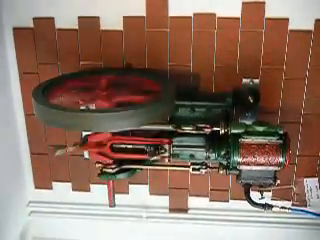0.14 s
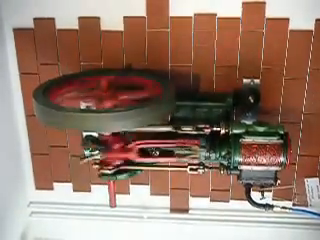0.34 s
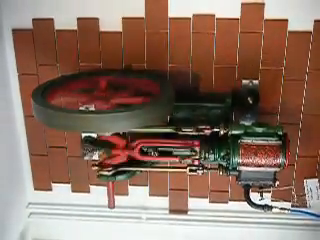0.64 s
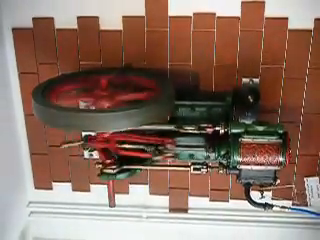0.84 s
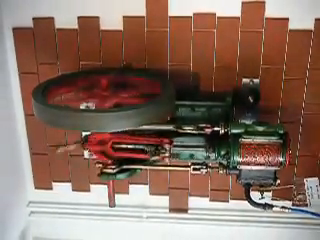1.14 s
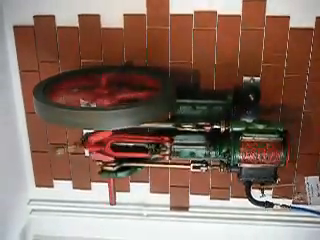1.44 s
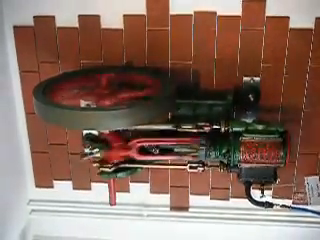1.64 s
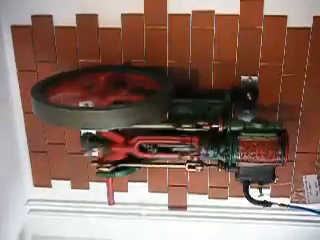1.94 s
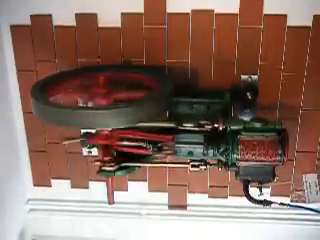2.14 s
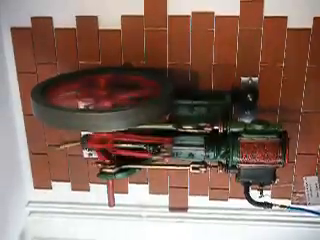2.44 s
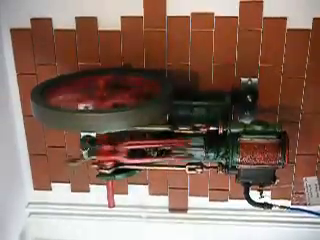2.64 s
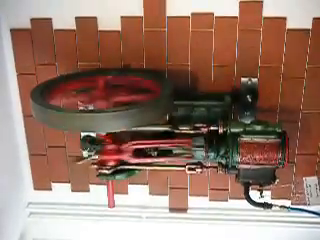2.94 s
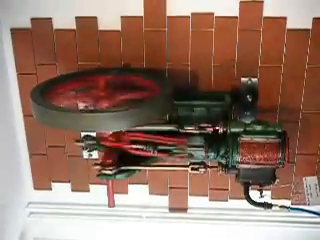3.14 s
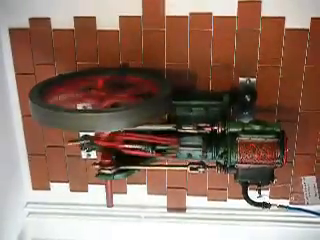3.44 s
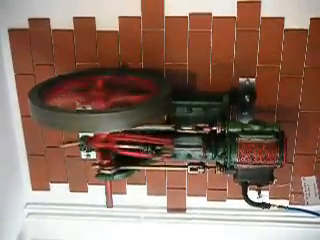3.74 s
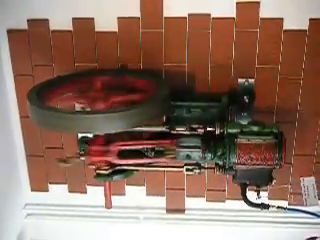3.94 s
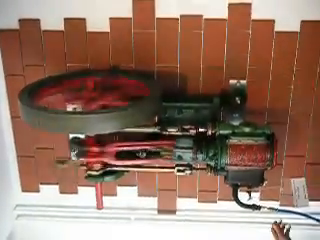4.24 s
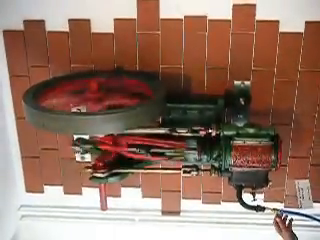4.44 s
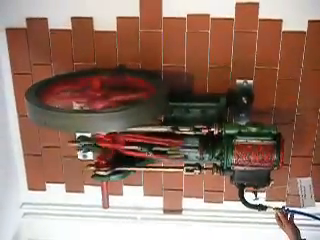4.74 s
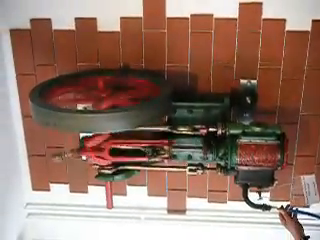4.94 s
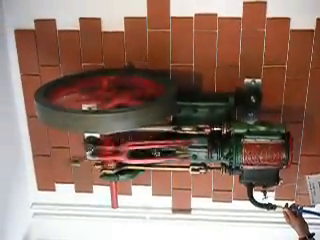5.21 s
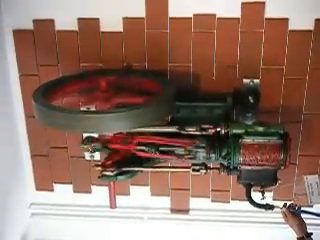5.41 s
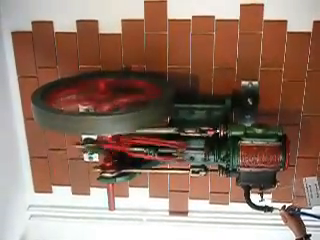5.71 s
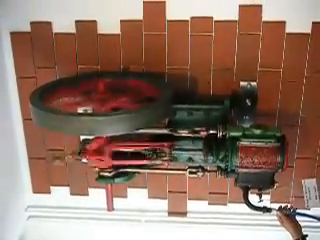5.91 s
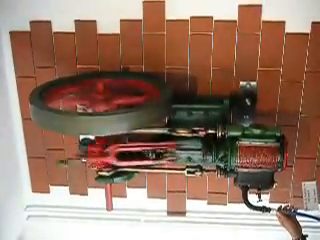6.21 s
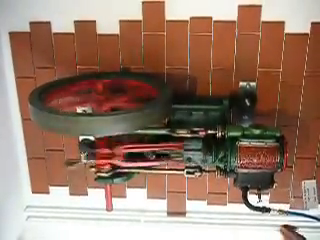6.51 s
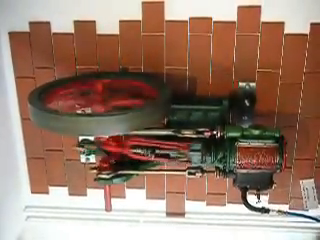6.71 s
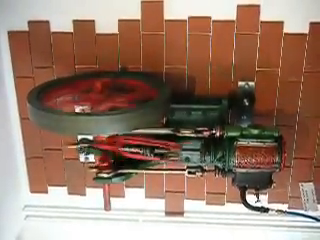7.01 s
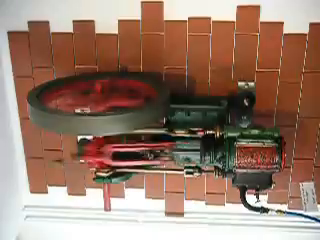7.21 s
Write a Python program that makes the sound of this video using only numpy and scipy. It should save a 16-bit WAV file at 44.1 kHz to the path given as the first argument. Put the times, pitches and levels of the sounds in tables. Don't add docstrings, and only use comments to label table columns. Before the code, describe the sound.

Fast, steady metallic clacking of a small piston engine, about six alternating knocks a second, with puffing air, flywheel ring and gritty sound.

```python
import sys
import numpy as np
from scipy import signal
from scipy.fft import rfft, irfft, next_fast_len
from scipy.io import wavfile
from scipy.ndimage import uniform_filter1d, map_coordinates

SR = 44100
rng = np.random.default_rng(int(sys.argv[2]) if len(sys.argv) > 2 else 0)


def volts(x):
    e = np.asarray(x, float) / 20
    return 10 ** e


def store_wav(level_fs):
    pcm = np.round(np.clip(np.atleast_2d(level_fs), -1, 1) * 32767)
    wavfile.write(sys.argv[1], SR, pcm.T.astype(np.int16))


N = 324576
BLOW_T = np.arange(SR * 2 // 5) / SR - 1 / 10


def unit(x):
    return x / np.sqrt(np.mean(x ** 2) + 1e-20)


def along(points, hz):
    f, value = np.transpose(points)
    return np.interp(np.log(hz + 1), np.log(f + 1), value)


def noise():
    return rng.standard_normal(N)


def wobble(rate):
    knots = rng.standard_normal(int(N * rate / SR) + 4)
    return map_coordinates(knots, [np.arange(N) * rate / SR])


def filtered(x, response):
    m = next_fast_len(N + SR // 2)
    spectrum = rfft(x, m) * response(np.fft.rfftfreq(m, 1 / SR))
    return irfft(spectrum, m)[..., :N]


def shaped(x, curve):
    return filtered(x, lambda hz: volts(along(curve, hz)))


# frequency in Hz, level in dB.
HISS = [(300, -1), (3300, -2), (4050, -8.5), (4700, -3.5), (5250, -10.5), (5800, 10), (6400, 1.8),
        (7000, -0.5)]


def hiss():
    return volts(-37 + 2.1 * wobble(8.6)) * shaped(noise(), HISS)


# frequency in Hz, level in dB per Hz.
RUMBLE = [(10, 9.5), (30, 11.5), (70, -10), (130, -16.5), (400, -22), (900, -65)]


def rumble():
    low = unit(shaped(noise(), RUMBLE))
    rod_knocks = effort(len(ANSWER) - 1)[1]
    jolts = uniform_filter1d(rod_knocks, size=600)
    return volts(-30) * unit(low * volts(3.7 * wobble(9)) * (1 + volts(21) * jolts))


# frequency in Hz, t60 in seconds.
ROOM = [(200, 0.81), (1500, 0.53), (7000, 0.53)]


def room(x):
    hop, out = SR // 4, np.zeros(N + 2 * SR)
    padded = np.pad(x, (hop, 2 * hop))
    fade = np.sin(np.pi * np.arange(2 * hop) / (2 * hop))
    for at in range(-hop, N, hop):
        hz, t, z = signal.stft(rng.standard_normal(SR // 2), SR, nperseg=256)
        decay = volts(-60 * t / along(ROOM, hz)[:, None])
        tail = signal.istft(z * decay, SR, nperseg=256)[1]
        piece = padded[at + hop:at + 3 * hop] * fade
        wet = signal.fftconvolve(piece, tail / np.linalg.norm(tail))
        out[at + hop:][:len(wet)] += wet
    return out[hop - 300:][:N]


FOLLOWS = [0.82, 0.36, 0.56, 0.53, 0.73]


def reaching(part, db, typical_db):
    swing = FOLLOWS[part] * (np.asarray(db) - typical_db[-1])
    scatter = 0.87 * rng.standard_normal(len(swing)) * (part < len(FOLLOWS) - 1)
    return typical_db[part] + swing + scatter


def add(power, s, shape):
    at = round(s * SR) + np.arange(len(shape)) - SR // 10
    inside = (at >= 0) & (at < N)
    power[at[inside]] += shape[inside]


# time in seconds, chatter level in dB.
RUNNING = [
    (0, -1),
    (.9, 0),
    (1.8, 0),
    (2.7, -0.5),
    (3.6, -0.5),
    (4.5, 1.5),
    (5.4, 1),
    (6.3, 1.5),
    (7.36, 1),
]


def running_air(s):
    return np.interp(s, *np.transpose(RUNNING))


# time in seconds, rod level in dB, rattle width in ms, extra ring of the castings in dB.
INNER = [(0.153, -19, 5.8, -2.5), (0.491, -16.5, 6.2, 2), (0.818, -16.5, 5.5, 1.5), (1.153, -21.5, 10, 2),
         (1.473, -18.5, 5.8, 0), (1.797, -21.5, 9, -0.5), (2.119, -22, 6.4, 2.5), (2.438, -19.5, 6.7, 2.5),
         (2.756, -18.5, 4.3, -4), (3.079, -19, 6.8, 1.5), (3.399, -16.5, 3, -1.5), (3.716, -16, 3.9, -3.5),
         (4.034, -18, 4.5, -6.5), (4.36, -22, 12, -0.5), (4.675, -20, 5.3, -1), (4.995, -18.5, 5.8, -1),
         (5.316, -22, 7.3, -1.5), (5.644, -23.5, 11, 2.5), (5.958, -20, 4.6, 1), (6.284, -21, 5.9, 1.5),
         (6.618, -23, 5.3, 2), (6.94, -17, 7, -1.7), (7.264, -22.5, 8.2, 1.5)]
# time in seconds, rod level in dB, rattle width in ms, valve blow in dB.
OUTER = [(0.008, -20, 10, -18), (0.341, -17.5, 5.2, -34), (0.676, -21, 17, -27), (1.001, -21.5, 9.7, -30.5),
         (1.336, -19, 6.5, -31), (1.664, -19.5, 9.5, -30.5), (1.979, -20, 6.8, -32.5),
         (2.305, -16.5, 2.3, -29), (2.621, -19, 13.5, -33), (2.945, -15.5, 3.8, -29),
         (3.26, -20, 11, -28.5), (3.58, -17, 8.5, -27.5), (3.908, -17.5, 10.2, -32.5),
         (4.219, -18, 7.5, -35.5), (4.539, -23.5, 27, -32.5), (4.863, -17.5, 6.9, -27.5),
         (5.18, -16.5, 10, -27.5), (5.502, -19.5, 6.6, -33.5), (5.824, -19.5, 13, -25),
         (6.146, -26, 39, -25), (6.469, -19.5, 14, -25.5), (6.799, -23, 16.4, -27), (7.122, -21, 6.9, -25)]
# typical inner level in dB, typical outer level # in
# dB, share of the extra ring, outer change in dB per dB of running air (more air softens the cylinder and
# rods), # loss in dB per doubling of rattle width (a long rattle spreads the same blow).
INNER_DB = [-15, -14, -15.5, -19, -17.5]
OUTER_DB = [-29, -23.5, -19.5, -21, -20]
RINGS = [.01, 0.91, .9, 0.35, .01]
CUSHION_DB = [2.5, 0.5, -1, 2, -0.9]
THINS_DB = [.1, 1.9, 2.1, 1.3, .1]
# knock lag in ms, knock spread as a factor, tail in dB, tail t60 in seconds,
# running chatter in dB, trim in dB.
ANSWER = [
    (-18.5, 1.6, -13, .5, -31.5, -19.5),
    (-5.5, 1.08, -2, 0.58, -27, -3.5),
    (-9.5, 0.9, -4.5, 0.4, -25, -1),
    (-7.5, 0.94, -5.5, 0.51, -30.5, 1.5),
    (-5, 0.83, -9.5, 0.49, -33.5, 1),
]


def dead_centres(part, power, knocks):
    lag_ms, spread, tail_db, t60, _, trim_db = ANSWER[part]
    inner_s, inner_db, inner_ms, ring_db = np.transpose(INNER)
    outer_s, outer_db, outer_ms, _ = np.transpose(OUTER)
    inner_levels = reaching(part, inner_db, INNER_DB) + RINGS[part] * ring_db
    outer_levels = reaching(part, outer_db, OUTER_DB) + CUSHION_DB[part] * running_air(outer_s)
    times, widths = np.r_[inner_s, outer_s], np.r_[inner_ms, outer_ms]
    for s, db, width_ms in zip(times, np.r_[inner_levels, outer_levels], widths):
        u = (BLOW_T - lag_ms / 1000) / (spread * width_ms / 1000)
        burst = np.exp(-(u * np.where(u < 0, 1.25, 0.9)) ** 2 / 2)
        onset = 1 / (1 + np.exp(-2 * np.clip(u, -20, 20)))
        tail = volts(tail_db - 60 * BLOW_T / t60) ** 2 * onset
        level = volts(db + trim_db - THINS_DB[part] * np.log2(width_ms / 7)) ** 2
        add(knocks, s, level * burst)
        add(power, s, level * tail)


def gate(t, width_s):
    return 1 / (1 + np.exp(np.clip(-t / width_s, -40, 40)))


VALVE_DB = [-23, -21.5, -24.5, -20.5, -25.5]


def valve(part, power, knocks):
    lead_s, snap_after_s, snap_s, snap_db = 0.064, 0.022, 0.01, 0
    open_width_s, open_at_s = (0.025, -0.04) if part == 0 else (0.003, 0.001)
    blow = gate(BLOW_T - open_at_s, open_width_s) * gate(0.055 - BLOW_T, 0.006)
    snap = np.exp(-((BLOW_T - snap_after_s) / snap_s) ** 2) * (part > 0)
    outer_s, _, _, valve_db = np.transpose(OUTER)
    for s, db in zip(outer_s - lead_s, reaching(part, valve_db, VALVE_DB)):
        add(power, s, volts(db - 0.5) ** 2 * blow)
        add(knocks, s, volts(db + snap_db) ** 2 * snap)


def effort(part):
    running_db = ANSWER[part][4]
    power = volts(running_air(np.arange(N) / SR) + running_db) ** 2
    knocks = np.zeros(N)
    dead_centres(part, power, knocks)
    valve(part, power, knocks)
    return np.sqrt(power), np.sqrt(knocks)


def ringing(x, modes):
    def raw(f):
        total = 0
        for k, (centre, width, db) in enumerate(modes):
            damping = 1j * f * width
            total = total + (-1) ** k * volts(db) * damping / (centre ** 2 - f ** 2 + damping)
        return total

    norm = np.sqrt(np.mean(abs(raw(np.arange(SR // 2) + 0.5)) ** 2))
    return filtered(x, lambda f: raw(f) / norm)


# frequency in Hz, width in Hz, level in dB.
BASE = [(160, 85, -10.5), (262, 52, -4), (309.5, 43.6, -0.5), (417, 109, -6.5), (507, 49, -2.5),
        (599, 216, -10)]
FRAME = [(754, 45.5, -6), (830, 29.5, -6), (887, 19.2, 0.5), (955.4, 24.5, -4.5), (1092, 76, -8),
         (1220, 61, -7)]
CYLINDER = [(1388, 70, -4.5), (1435, 28.5, -2), (1526.6, 40, 2.5), (1578.5, 34, 2), (1601, 42.6, 1.5),
            (1858, 124, -3)]
CROSSHEAD = [(1929, 82, 4), (2056, 60, 8.5), (2212, 64, 3), (2315, 71, 6), (2480, 15, -8)]
RODS = [(2393, 360, 2), (2854, 156, 5.5), (3190, 41, 8.5), (3340, 86, 4.5), (3553, 54, 4.5),
        (3916, 280, -5), (4310, 50, 2.5), (4570, 150, -0.5), (4680, 42, 1.5), (4936, 204, -4.5),
        (5396, 31, -2.5), (5606, 200, -8), (6290, 68, -6.5), (6730, 96, -8.5)]
WHEEL = [(878.5, 19, 1), (1163, 20, -6.5), (1595, 48, -1.5), (2162, 24, 1), (2305, 39, -13.5),
         (3160, 7.5, -15.5), (4690, 17, -19.5), (5752, 90, -15.5)]


def engine():
    ticks = unit(noise() * volts(1.34 * wobble(220) + 2.1 * wobble(900)))
    chatter = unit(noise() * volts(1.84 * wobble(160) + 2.55 * wobble(900)))
    parts = [BASE, FRAME, CYLINDER, CROSSHEAD, RODS]
    slack_db = [2, 1.5, 1.1, 1, 0.5]
    shared_db = 0.9 * wobble(30)
    castings, load = 0, 0
    for k, modes in enumerate(parts):
        between, knocks = effort(k)
        waver = volts(slack_db[k] * wobble(22) + shared_db)
        castings = castings + ringing(chatter * between * waver + ticks * knocks, modes)
        if k in (1, 2, 3):
            load = load + between + knocks
    wheel = volts(-12.5) * ringing(load * noise(), WHEEL)
    return wheel + castings


def scene():
    near = engine()
    return (volts(-0.2) * near + volts(-7) * room(near) + rumble() + hiss())[None]


# frequency in Hz, gain in dB.
SENSOR = [(60, -4.5), (200, -2), (6000, 3), (6600, 7.5), (6850, -10), (7020, 5.5), (7200, -29)]


def microphone(x):
    x = shaped(x, SENSOR)
    x = x / (1 + abs(x / 0.84) ** 5) ** (1 / 5)
    return filtered(x, lambda hz: (hz < 7200) * hz ** 2 / (hz ** 2 + 60 ** 2))


def straight_lines(x):
    up, down = 5, 14
    slow = signal.resample_poly(x, up, down, window=("kaiser", 8.0))
    return np.interp(np.arange(N) * up / down, np.arange(len(slow)), slow)


def starved(x, floor_db, sway_db, main_db):
    window = np.sin(np.pi * (np.arange(2048) + 0.5) / 2048)
    hz, t, z = signal.stft(x, SR, window, 2048)
    loud = np.median(abs(z[(hz > 9000) & (hz < 14500)]), axis=0)
    usual = np.median(abs(z[(hz > 11600) & (hz < 12200)]))
    faint = usual * (loud / np.median(loud)) ** 0.7
    sway = uniform_filter1d(rng.standard_normal(z.shape), size=60, axis=0) * 4
    sway = sway + rng.standard_normal(len(t))
    main = (hz < 7800)[:, None]
    keep = abs(z) > faint * volts(floor_db + sway_db * sway + main_db * main)
    return signal.istft(z * keep, SR, window, 2048)[1][:N]


# time in seconds, peak in dB.
GLITCH = [
    (3.956, -9),
]


def glitch(x):
    for s, db in GLITCH:
        x[round(s * SR)] += volts(db)
    return x


def roll_off(x):
    return signal.sosfilt(signal.butter(12, 15710, fs=SR, output="sos"), x)


def record(dry):
    x = straight_lines(microphone(dry[0]))
    x = starved(x, floor_db=-0.6, sway_db=3.5, main_db=4)
    x = glitch(x + 0.094)
    return roll_off(x[None])


dry = scene()
out = record(dry)
store_wav(out)
```